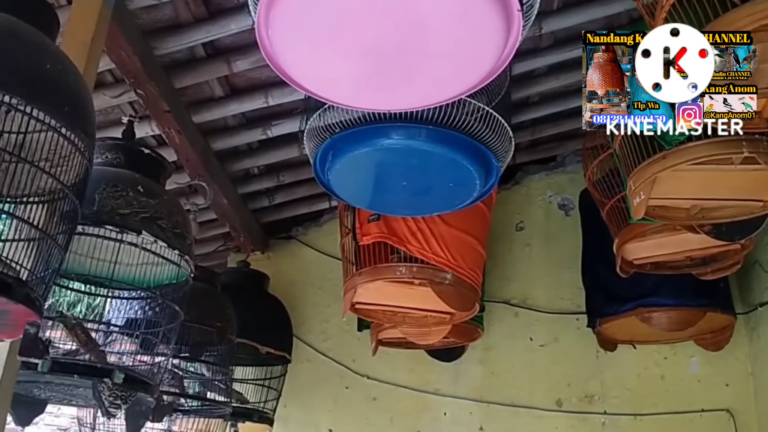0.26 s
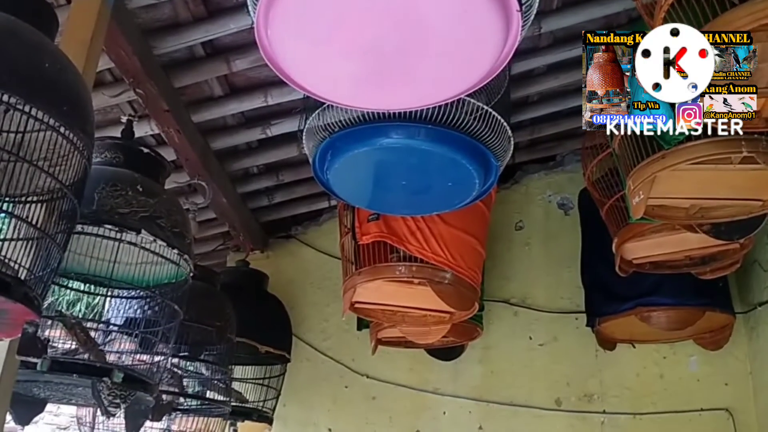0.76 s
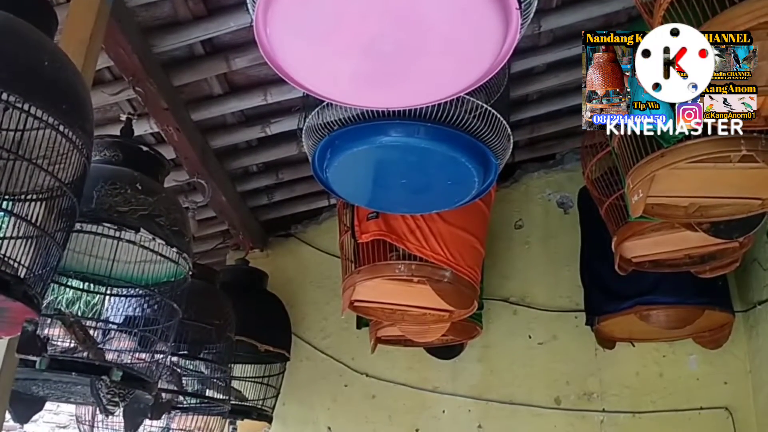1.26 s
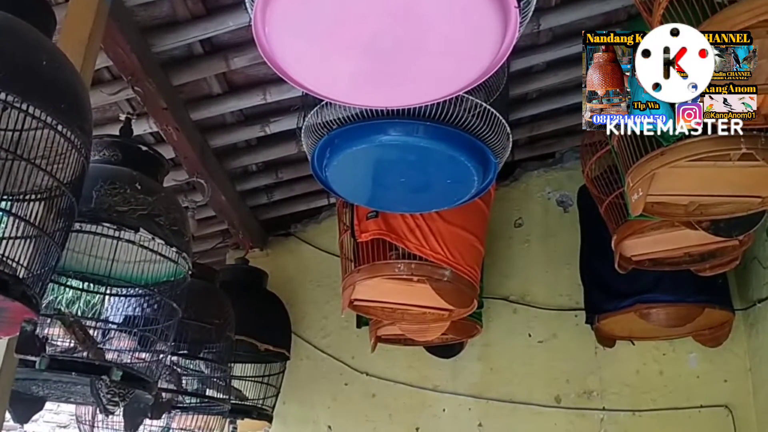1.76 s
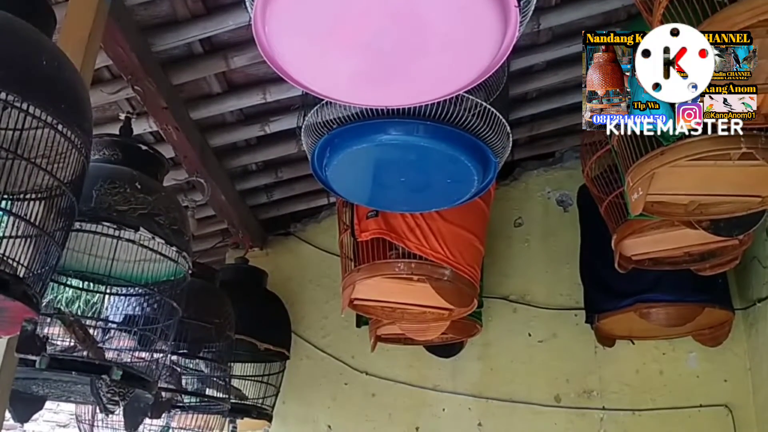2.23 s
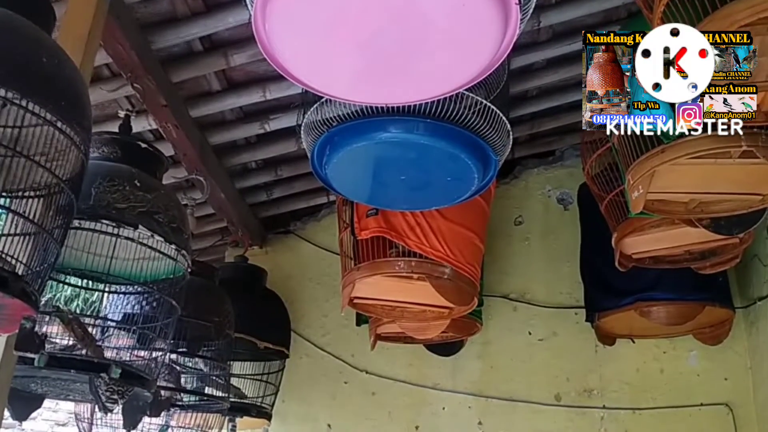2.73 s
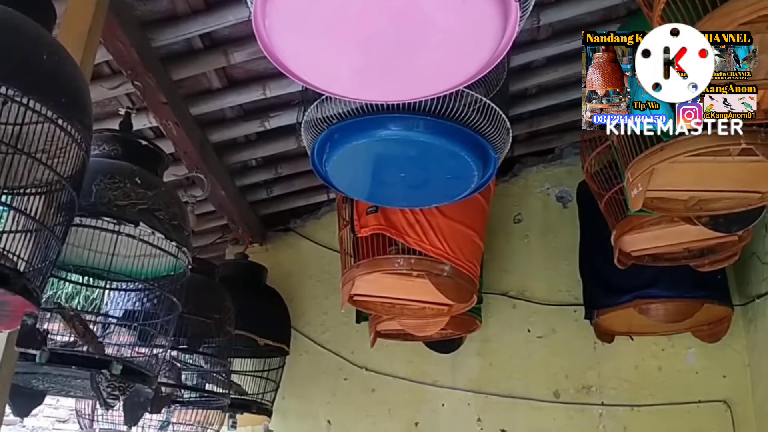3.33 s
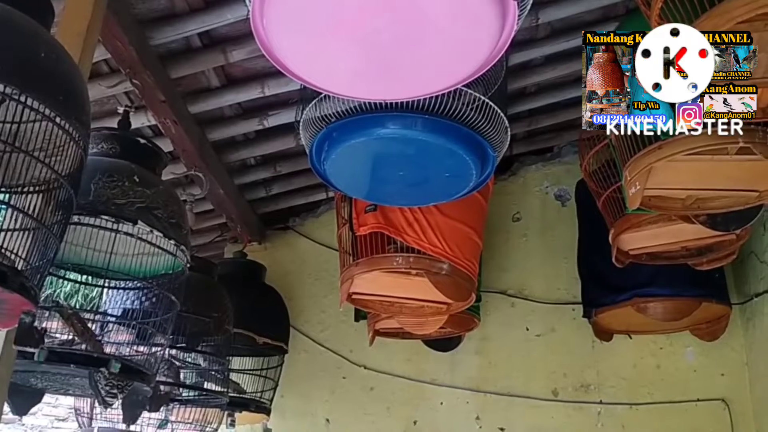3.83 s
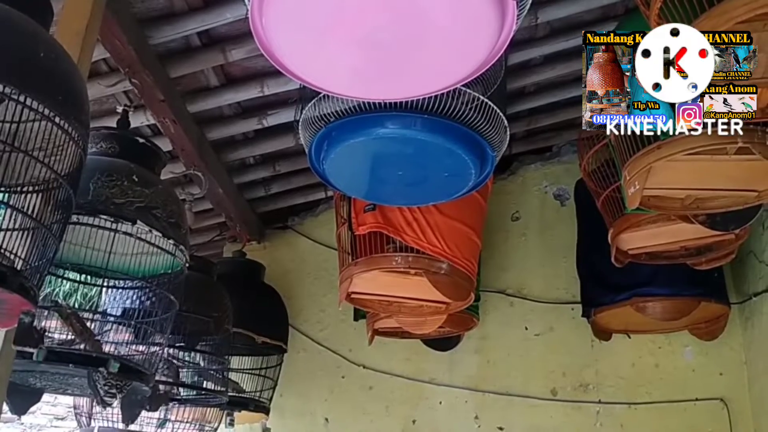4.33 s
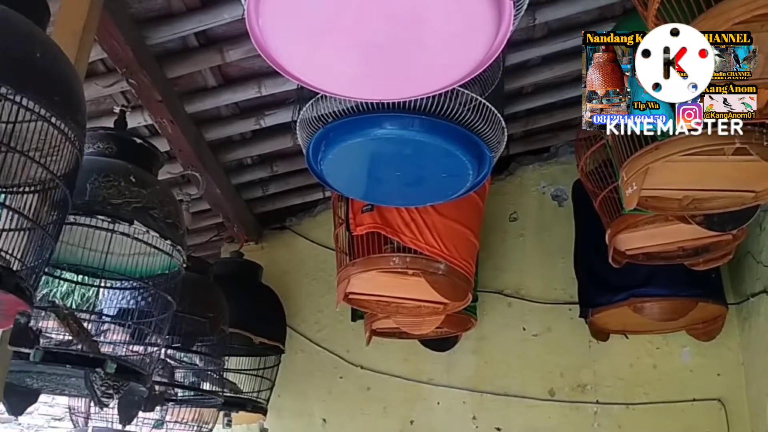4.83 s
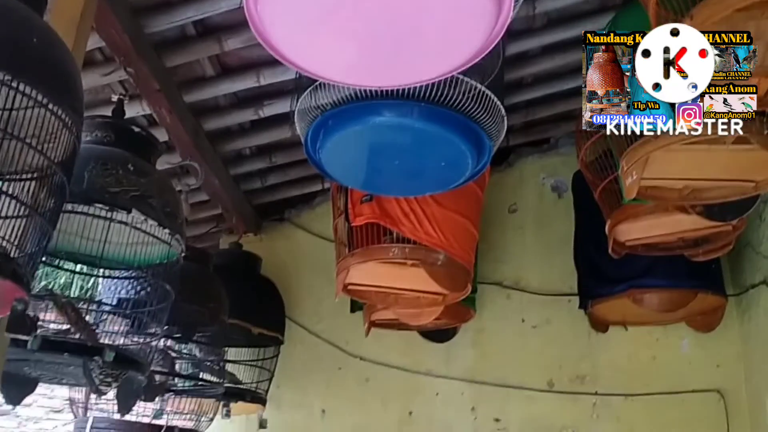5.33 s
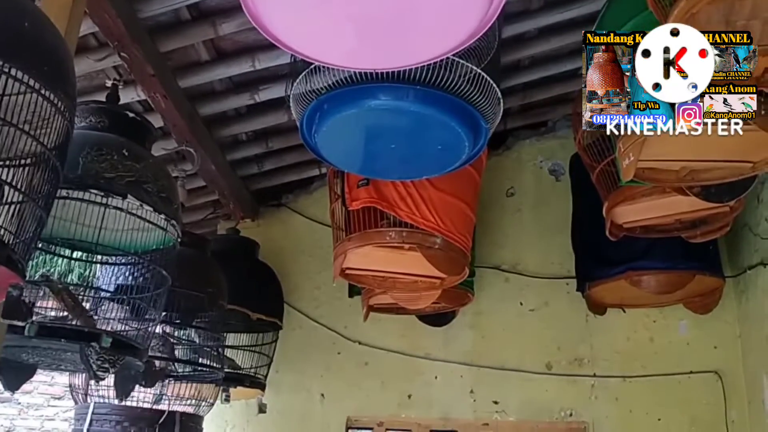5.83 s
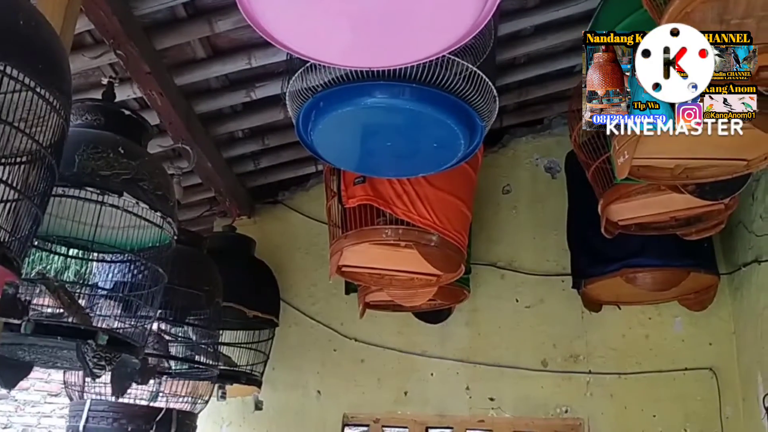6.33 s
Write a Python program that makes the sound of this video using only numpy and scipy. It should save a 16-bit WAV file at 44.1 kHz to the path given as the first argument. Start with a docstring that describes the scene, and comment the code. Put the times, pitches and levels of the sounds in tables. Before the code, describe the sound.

A low rumble of distant traffic and breeze runs throughout, with fine, dry rustling and crackling close by. At 0.3 seconds a caged dove begins a coo: a short note, a purring trill from 0.7 to 1.7, a long fluttering note that swells into a nearly pure tone, and a low falling ending by 2.6. From about 2.7 to 3.6 seconds a smaller dove answers with a few higher piping notes, the first loud and clear. The first dove coos again from 3.7 seconds, trilling from 4.2, swelling from 5.3 and falling away by 6.1. Light taps on cage wire and wood are scattered throughout, with thin ticks between 5 and 6 seconds and a sharper knock near 5.7. Far birds call faintly now and then. The roofed, open-sided shelter gives the calls a short, slightly ringing echo.

```python
"""Under a tiled roof, a caged dove coos twice: a short note, a purring trill, a long swell, a low ending.
Its inflated throat resonates in a nearly pure tone, which flutter modulates in level and pitch.
A smaller dove answers higher and far birds call. Cage wire and wood ring at their natural modes,
something dry rustles and ticks close by, and the shelter adds echoes and standing waves.
The low rumble of distant traffic and breeze lies under it all."""
import sys
import numpy as np
from scipy import signal
from scipy.io import wavfile
from scipy.ndimage import uniform_filter1d

SR = 44100
rng = np.random.default_rng(int(sys.argv[2]) if len(sys.argv) > 2 else 0)


def digitize_waveform(pressure):
    """Quantize a signal to 16-bit integers and store it at the path in sys.argv[1].

    Rows of a 2-D input are taken as channels; values are limited to [-1, 1].
    """
    field = np.atleast_2d(pressure).T
    bounded = np.clip(field, -1, 1)
    quanta = np.round(bounded * 32767).astype(np.int16)
    wavfile.write(sys.argv[1], SR, quanta)


N = 290611

# spectrum of the outdoor rumble: (frequency [Hz], relative density [dB])
RUMBLE_SPECTRUM = [(8.8, -35.5), (15, 4.5), (81, -3.5), (145, -13), (183, -12.5), (220, -14.5),
                   (414, -16.5), (466, -14.5), (536, -23.5), (588, -15.5), (761, -24.5), (836, -21.5),
                   (896, -27), (1370, -37), (4000, -57), (5200, -70.5), (8800, -120)]
# low hums in the rumble: (frequency [Hz], bandwidth [Hz], level [dB])
HUM_BANDS = [(46, 3, -44), (66, 6, -46)]
# far birds and thin squeaks: (time [s], duration [s], start pitch [Hz], end pitch [Hz], level [dB],
# second harmonic level [dB], pitch wander [Hz])
FAR_CALLS = [(0, .12, 810, 800, -50, -80, 15), (1.58, .36, 1560, 1540, -63, -80, 50),
             (2.36, .28, 1410, 1400, -61, -80, 15), (1.595, .065, 2565, 2565, -63, -53, 8),
             (1.665, .035, 2565, 2565, -66, -58, 8), (3.23, .1, 2500, 2500, -72, -67, 20),
             (3.12, .16, 2550, 1950, -62, -80, 150), (3.03, .05, 1700, 1800, -57, -80, 40),
             (6.14, .09, 760, 760, -51, -80, 10), (6.28, .3, 835, 825, -52, -80, 10)]
# taps on cage wire: (time [s], level [dB], ring pitch [Hz])
WIRE_TAPS = [(.026, -45, 3402), (3.591, -43, 3467), (5.2154, -44, 3542)]
# modes of the wire: (frequency [multiple of ring pitch], gain [dB], 60 dB decay time [s])
WIRE_MODES = [(.5, -5, .1), (.67, -14, .08), (.93, -15, .1), (.992, -7, .15), (1, -2, .15),
              (1.009, -11, .36), (1.21, -11, .1), (1.46, -11, .12), (2.0, -5, .2)]
# swishes and crackles: (peak time [s], level [dB], 20 dB rise time [s], 60 dB decay time [s])
RUSTLE_STROKES = [(.03, -47, .03, .5), (.235, -44, .2, .5), (.355, -46, .04, .7), (.492, -42, .01, .2),
                  (.64, -39, .05, .8), (.86, -48, .03, .3), (1.287, -35, .013, .4), (1.368, -42, .01, .15),
                  (1.697, -29.5, .008, .22), (1.93, -36, .012, .22), (2.0, -42, .01, .2),
                  (2.11, -43, .01, .2), (2.18, -42, .1, .3), (2.49, -47, .03, .4), (2.725, -43, .01, .2),
                  (2.93, -38, .1, .5), (3.1, -42, .015, .25), (3.325, -34.5, .08, .6), (3.5, -37, .05, .4),
                  (3.64, -43, .03, .15), (3.705, -38.5, .12, .7), (3.852, -41, .01, .12),
                  (3.915, -37.5, .008, .3), (4.045, -41, .02, 1.8), (4.34, -45, .03, .15),
                  (4.441, -35.5, .012, .4), (4.582, -43, .015, .2), (4.77, -44, .2, .6),
                  (4.912, -32.5, .005, .25), (5.037, -43, .015, .15), (5.138, -42, .01, .2),
                  (5.23, -41, .04, .2), (5.37, -45, .06, .2), (5.392, -43, .006, .15),
                  (5.49, -43, .04, .15), (5.56, -41, .007, .15), (5.632, -44, .015, .4),
                  (5.722, -37, .05, .3), (5.96, -44, .01, .15), (6.31, -36.5, .13, 1.3),
                  (6.52, -42, .01, .15)]
# spectra of soft and hard rustling: (frequency [Hz], relative density [dB])
SOFT_SPECTRUM = [(1470, -52.5), (2500, -41.5), (3090, -35), (3570, -11.5), (3950, -17), (5890, -10.5),
                 (7030, -4), (7540, 6), (7880, -11), (8290, -17), (10800, -43), (18200, -120)]
HARD_SPECTRUM = [(1470, -68.5), (2500, -39), (3240, -30.5), (5890, -11.5), (7420, 6), (7810, 0),
                 (8290, -19.5), (10800, -47), (18200, -120)]
# thin rings in the rustle: (frequency [Hz], bandwidth [Hz], gain [dB])
RUSTLE_RINGS = [(7500, 50, -3), (7720, 40, -6)]
# starts of the large dove's coos: (time [s], gain [dB])
COO_STARTS = [(.305, 0), (3.735, 0)]
# each coo's rising pickup and short sagging note: (time into the coo [s], pitch [Hz], level [dB])
PICKUP_CONTOUR = [(0, 475, -36), (.016, 505, -27), (.035, 560, -25)]
SHORT_CONTOUR = [(.03, 540, -24), (.04, 660, -25), (.1, 626, -25.5), (.15, 608, -26), (.2, 599, -33),
                 (.28, 592, -44)]
# knocks on cage wood: (time [s], burst level [dB], centre [Hz], 60 dB decay time [s], ring level [dB])
WOOD_KNOCKS = [(.6173, -49.5, 1380, .13, -62), (.971, -53.5, 1310, .09, -66), (1.289, -41, 2700, .14, -50),
               (3.5223, -48, 1420, .11, -60), (5.561, -43.5, 1630, .06, -62), (5.6337, -46, 1340, .16, -58),
               (5.703, -35, 4200, .08, -45), (5.714, -30, 4300, .15, -37), (6.125, -54, 1830, .09, -66)]
# modes of the wood: (frequency [Hz], gain [dB], 60 dB decay time [s])
WOOD_MODES = [(1405, -6, .25), (1500, -4, .15), (3100, -8, .06), (4200, -7, .1), (4447, -7, .16),
              (4635, -9, .22)]
# puffs of the trill: (time [s], level [dB], duration [s], end pitch [Hz])
TRILL_PUFFS = [(.701, -41, .03, 540), (.816, -37, .03, 540), (.881, -37, .03, 560), (.937, -35, .036, 540),
               (.999, -33, .045, 540), (1.053, -32, .058, 530), (1.123, -34, .04, 620),
               (1.19, -30, .062, 535), (1.272, -29, .056, 535), (1.347, -28, .062, 545),
               (1.429, -28, .074, 555), (1.526, -29, .1, 700), (1.635, -29, .1, 630),
               (4.176, -41, .034, 640), (4.242, -36, .032, 560), (4.309, -44, .035, 640),
               (4.354, -38, .038, 660), (4.409, -31, .036, 560), (4.474, -35, .04, 670),
               (4.538, -33, .035, 560), (4.609, -29, .062, 540), (4.682, -28, .04, 560),
               (4.76, -28, .064, 545), (4.843, -28, .062, 580), (4.928, -30, .084, 610),
               (5.032, -27, .122, 720), (5.172, -29, .105, 650)]
# long swelling notes, one list each: (time [s], pitch [Hz], level [dB], flutter depth [0-1])
LONG_CONTOURS = [
    [(1.73, 646, -24, .1), (1.765, 660, -21, .15), (1.79, 684, -29, .7), (1.87, 672, -28, .75),
     (1.98, 680, -28, .75), (2.035, 674, -23, .6), (2.06, 671, -18.5, .1), (2.09, 671, -15, .05),
     (2.18, 669, -15.5, .05), (2.255, 660, -13, .07), (2.3, 651, -15, .05), (2.33, 648, -19.5, .05),
     (2.344, 640, -27, .05), (2.353, 630, -23, .1), (2.365, 620, -28, .1)],
    [(5.27, 648, -21, .05), (5.305, 660, -18, .05), (5.325, 692, -30, .6), (5.42, 680, -29, .8),
     (5.45, 680, -27, .5), (5.462, 680, -21, .1), (5.473, 680, -28, .1), (5.485, 680, -19, .1),
     (5.498, 678, -30, .1), (5.51, 673, -17, .1), (5.545, 672, -18, .1), (5.56, 674, -34, .1),
     (5.575, 673, -15, .05), (5.63, 668, -14.5, .03), (5.7, 659, -14.5, .05), (5.735, 652, -18, .03),
     (5.75, 648, -16, .03), (5.762, 635, -32, .03), (5.774, 622, -18, .03), (5.786, 618, -19, .03),
     (5.8, 612, -13, .03), (5.81, 610, -15, .03), (5.822, 606, -18, .05), (5.845, 598, -36, .1)],
]
# low endings of the coos: (time [s], duration [s], start pitch [Hz], end pitch [Hz], level [dB])
LOW_ENDINGS = [(2.355, .28, 556, 492, -28), (5.815, .275, 560, 497, -28)]
# hoarse catches that open the small dove's louder notes: (time [s], level [dB])
THROAT_CATCHES = [(2.741, -36), (3.127, -41), (3.255, -45)]
# the small dove's notes, one list each: (time [s], pitch [Hz], level [dB])
PIPING_CONTOURS = [
    [(2.762, 925, -32), (2.785, 945, -17), (2.804, 958, -11), (2.818, 953, -16), (2.84, 951, -13),
     (2.9, 948, -14), (2.94, 944, -13), (2.968, 942, -23), (2.992, 942, -18), (3.022, 930, -32),
     (3.036, 890, -29), (3.062, 880, -38)],
    [(3.062, 900, -36), (3.073, 905, -28), (3.083, 908, -36), (3.095, 912, -25), (3.11, 900, -36),
     (3.135, 900, -42)],
    [(3.138, 905, -36), (3.15, 918, -29), (3.173, 928, -20), (3.185, 915, -31), (3.2, 915, -28),
     (3.222, 915, -30), (3.238, 895, -39), (3.265, 905, -40)],
    [(3.265, 905, -38), (3.285, 925, -25), (3.3, 940, -15), (3.312, 938, -19), (3.326, 936, -16),
     (3.36, 933, -24), (3.378, 930, -37), (3.405, 925, -28), (3.42, 915, -37), (3.435, 928, -34),
     (3.49, 930, -41), (3.61, 925, -50)],
]
# thin ticks, as of seed husks cracking: (time [s], level [dB], centre [Hz], 60 dB decay time [s])
DRY_TICKS = [(5.133, -36, 6960, .12), (5.215, -39, 7220, .2), (5.391, -39, 6550, .12),
             (5.559, -41, 6700, .05), (5.958, -43, 7630, .05)]
# standing waves between roof, wall and floor: (frequency [Hz], gain [dB], nominal decay time [s])
SHELTER_MODES = [(497, 0, 0.24), (534, -9, 0.33), (575, 0, 0.19), (615, -5, .45), (663, -11.5, 0.43),
                 (699.3, -7.5, 0.35), (840, -10, .5), (933, -4, 0.53), (955, -4, 0.8)]
# early reflections: (delay [s], gain [dB])
REFLECTIONS = [(.004, -17.5), (.011, -4), (.019, -9), (.031, -11.5)]


def gain_of(db):
    """Amplitude grows tenfold for every 20 decibels."""
    return 10 ** (np.asarray(db) / 20)


def unit_rms(x):
    """Normalisation to a mean power of one."""
    return x / np.sqrt(np.mean(x ** 2) + 1e-20)


def spectrum_at(points, hz):
    """Interpolation of a spectrum on a logarithmic frequency axis."""
    frequencies, db = np.transpose(points)
    return np.interp(np.log(hz + 1), np.log(frequencies + 1), db)


def contour(rows):
    """Linear interpolation of a note: its start time, then each column sample by sample."""
    times, *columns = np.transpose(rows)
    t = np.arange(times[0], times[-1], 1 / SR)
    return times[0], *(np.interp(t, times, column) for column in columns)


def mix(*sources):
    """Superposition: the (start time, sound) pairs of all sources add linearly."""
    out = np.zeros(N)
    for source in sources:
        for start, sound in source:
            part = out[round(start * SR):][:len(sound)]
            part += sound[:len(part)]
    return out


def resonate(x, hz, width_hz):
    """A resonance of unit gain: the band is shifted to zero frequency, smoothed and shifted back."""
    carrier = np.exp(2j * np.pi * np.cumsum(np.full(len(x), hz)) / SR)
    pole = np.exp(-np.pi * width_hz / SR)
    return 2 * (carrier * signal.lfilter([1 - pole], [1, -pole], x / carrier)).real


def damped_modes(modes, t):
    """Free vibration is a sum of exponentially decaying sinusoids."""
    return sum(gain_of(db - 60 * t / t60) * np.sin(2 * np.pi * hz * t) for hz, db, t60 in modes)


def tone(hz, *levels_db, fade_s=.008):
    """A harmonic series on one pitch curve, tapered at both ends."""
    phase = 2 * np.pi * np.cumsum(hz) / SR
    wave = sum(gain_of(db) * np.sin(k * phase) for k, db in enumerate(levels_db, 1))
    return np.sqrt(2) * wave * signal.windows.tukey(len(hz), min(1, 2 * fade_s * SR / len(hz)))


def shaped_noise(shape_db, size):
    """Fourier synthesis from random short-time spectra whose level is shape_db(hz, times)."""
    frames, hz = 4 * N // size + 5, np.fft.rfftfreq(size, 1 / SR)
    real, imaginary = rng.standard_normal((frames, len(hz), 2)).T
    times = np.arange(frames) * size / 4 / SR
    spectra = (real + 1j * imaginary) * gain_of(shape_db(hz[:, None], times))
    return signal.istft(spectra, nperseg=size, noverlap=3 * size // 4)[1][:N]


def outdoor_rumble():
    """Distant traffic and breeze: broadband noise heavy in the bass, with wavering narrowband hums."""
    def colour(hz, times):
        patches = rng.standard_normal((len(times), len(hz))).T
        patches = uniform_filter1d(uniform_filter1d(patches, 8, axis=0), 8, axis=1)
        return spectrum_at(RUMBLE_SPECTRUM, hz) + 1.5 * unit_rms(patches)
    hum = sum(gain_of(db) * unit_rms(resonate(rng.standard_normal(N), hz, width))
              for hz, width, db in HUM_BANDS)
    return gain_of(-35.7) * unit_rms(shaped_noise(colour, size=2048)) + hum


def far_birds():
    """Random frequency modulation blurs each faint, gliding whistle."""
    for start, duration, start_hz, end_hz, db, second_db, wander_hz in FAR_CALLS:
        wander = unit_rms(uniform_filter1d(rng.standard_normal(SR), 250))[:round(duration * SR)]
        hz = np.linspace(start_hz, end_hz, len(wander)) + wander_hz * wander
        yield start, tone(hz, db, second_db, fade_s=.025)


def wire_clinks():
    """Tapped wire rings at inharmonic modes; modulation by noise roughens the ring into a clack."""
    t, rise_s = np.arange(SR // 2) / SR, .003
    for start, db, hz in WIRE_TAPS:
        ring = damped_modes([(ratio * hz, mode_db, t60) for ratio, mode_db, t60 in WIRE_MODES], t)
        roughness = 1 + rng.standard_normal(len(t))
        yield start, gain_of(db) * ring * np.minimum(t / rise_s, 1) * roughness


def rustle():
    """Incoherent strokes of fine dry grains add in power; the louder a stroke, the more its hiss takes on a
    harder colour."""
    rest_db = -52
    soft_db, hard_db = -56, -37  # levels at which each spectrum holds
    t = np.arange(N) / SR
    power = gain_of(rest_db) ** 2
    for peak, db, rise_s, t60 in RUSTLE_STROKES:
        power += gain_of(db + np.minimum(20 * (t - peak) / rise_s, -60 * (t - peak) / t60)) ** 2

    def colour(hz, times):
        level_db = np.interp(times, t, 10 * np.log10(power))
        hardness = np.clip((level_db - soft_db) / (hard_db - soft_db), 0, 1.2)
        return (1 - hardness) * spectrum_at(SOFT_SPECTRUM, hz) + hardness * spectrum_at(HARD_SPECTRUM, hz)
    hiss = shaped_noise(colour, size=256)
    hiss += sum(gain_of(db) * resonate(hiss, hz, width) for hz, width, db in RUSTLE_RINGS)
    hiss /= np.sqrt(uniform_filter1d(hiss ** 2, 4000))  # the strokes alone set the loudness
    spikes = rng.exponential(1, N) ** 2 - 2
    grain_db = 1.37 * unit_rms(uniform_filter1d(uniform_filter1d(spikes, 60), 40))
    return hiss * np.sqrt(power) * unit_rms(gain_of(grain_db))


def throat_tone(hz, db, second_db, third_db, flutter):
    """The inflated throat hums one tone; uneven flutter modulates its amplitude and frequency."""
    flutter_hz, rate_wander, pitch_swing = 40, .12, .018
    grain = round(.006 * SR)
    rasp = uniform_filter1d(uniform_filter1d(rng.standard_normal(SR), grain), grain)
    rasp = .6 * unit_rms(rasp)[:len(hz)]
    drift = unit_rms(uniform_filter1d(rng.standard_normal(SR), 3000))[:len(hz)]
    phase = 2 * np.pi * np.cumsum(flutter_hz * (1 + rate_wander * drift)) / SR
    depth = np.clip(flutter, 0, 1)
    throb = depth * (np.sin(phase) - .4 * np.sin(2 * phase) + rasp)  # swells slowly, drops fast
    bend = pitch_swing * depth * (rasp - np.cos(phase))  # pitch rises through each throb
    overtone_db = db.max() + .4 * (db - db.max())  # overtones vary less than the fundamental
    return tone(hz * (1 + bend), db, overtone_db + second_db, overtone_db + third_db) * (1 + throb)


def coo_openings():
    """A rising glide breaks into a short sagging note as the modulation deepens."""
    for start, gain_db in COO_STARTS:
        delay, hz, db = contour(PICKUP_CONTOUR)
        yield start + delay, throat_tone(hz, db + gain_db, second_db=-28, third_db=-50, flutter=.15)
        delay, hz, db = contour(SHORT_CONTOUR)
        yield start + delay, throat_tone(hz, db + gain_db, second_db=-46, third_db=-43, flutter=.45)


def wood_knocks():
    """An impact on cage wood gives a burst of band noise and excites briefly ringing modes."""
    t, rise_s = np.arange(SR // 2) / SR, .005
    ring = damped_modes(WOOD_MODES, t)
    for start, db, hz, t60, ring_db in WOOD_KNOCKS:
        band = unit_rms(resonate(rng.standard_normal(len(t)), hz, width_hz=1200))
        burst = gain_of(db - 7 - 60 * t / t60) * band  # rms starts 7 dB under the burst level
        yield start, (burst + gain_of(ring_db) * ring) * np.minimum(t / rise_s, 1)


def trill():
    """Pulsed airflow makes the purr: in each puff the pitch drops fast, rests low, then climbs."""
    top_hz, low_hz, sag_hz_per_s, lead_s = 650, 515, 450, .002
    for beat, db, duration, end_hz in TRILL_PUFFS:
        t = np.arange(0, duration, 1 / SR)
        rest_hz = low_hz - sag_hz_per_s * duration  # longer puffs rest lower
        fall_hz = (top_hz - rest_hz) * np.exp(-(t / (.22 * duration)) ** 2)
        climb_hz = (end_hz - rest_hz) * (t / duration) ** 3.6
        hz = rest_hz + fall_hz + climb_hz
        pouch_db = -.7 + .04 * (hz - low_hz)  # the throat pouch sounds best high up
        onset_db = -6 * np.exp(-t / .01)
        push_db = 3.5 * np.exp(-((t - .015) / .006) ** 2)  # the first push of air stands out
        level_db = db + pouch_db + onset_db + push_db
        yield beat - lead_s, throat_tone(hz, level_db, second_db=-42, third_db=-58, flutter=.22)


def long_notes():
    """Deep modulation settles as each note swells into an almost sinusoidal tone."""
    for rows in LONG_CONTOURS:
        start, hz, db, flutter = contour(rows)
        yield start, throat_tone(hz, db, second_db=-47, third_db=-59, flutter=flutter)


def coo_endings():
    """A steepening downward glide swells and dies, its overtones fading ahead of the tone's end."""
    for start, duration, start_hz, end_hz, db in LOW_ENDINGS:
        progress = np.arange(0, duration, 1 / SR) / duration
        hz = start_hz + (end_hz - start_hz) * progress ** 1.5
        level_db = db - 8 * (1 - progress) ** 3 - 14 * progress ** 8
        dull_db = -10 * progress ** 3
        yield start, throat_tone(hz, level_db, dull_db - 23, dull_db - 44, flutter=.12)


def throat_catches():
    """Breath noise, narrowed by resonance, clicks in the small dove's throat before a note locks in."""
    centre_hz = 1070
    for start, db in THROAT_CATCHES:
        breath = resonate(rng.standard_normal(1200), centre_hz, width_hz=160)
        burst = resonate(breath, centre_hz, width_hz=300) * signal.windows.tukey(len(breath), .5)
        yield start, gain_of(db) * unit_rms(resonate(burst, centre_hz, width_hz=500))


def small_dove():
    """A higher throat tone, clear when loud and more deeply modulated the softer it gets."""
    firm_db, flutter_per_db = -21, .04
    for rows in PIPING_CONTOURS:
        start, hz, db = contour(rows)
        flutter = .04 + flutter_per_db * np.maximum(firm_db - db, 0)
        yield start, throat_tone(hz, db, second_db=-63, third_db=-76, flutter=flutter)


def dry_ticks():
    """Sharp transients: narrow bands of treble noise start at once and decay exponentially."""
    t = np.arange(SR // 2) / SR
    for start, db, hz, t60 in DRY_TICKS:
        band = resonate(rng.standard_normal(len(t)), hz, width_hz=500)
        snap = unit_rms(resonate(band, hz, width_hz=1000))
        yield start, gain_of(db - 60 * t / t60) * snap


def shelter(x):
    """Reflection gives a repeating roof-to-floor slap, early echoes, standing waves and a diffuse tail."""
    trip_s, trip_db, tail_db, tail_t60 = .012, -8, -13, .55
    slaps = [(trip * trip_s, trip * trip_db) for trip in range(1, 10)]
    echoes = mix((delay, gain_of(db) * x) for delay, db in slaps + REFLECTIONS)
    standing = sum((-1) ** k * gain_of(db) * resonate(x, hz, 2.43 / decay_s)
                   for k, (hz, db, decay_s) in enumerate(SHELTER_MODES))
    t = np.arange(SR) / SR
    scatter = rng.choice([-1., 1.], SR) * (rng.random(SR) < .05)
    response = scatter * gain_of(-60 * t / tail_t60) * (t > .02)
    tail = signal.fftconvolve(x, response / np.linalg.norm(response))[:N]
    return x + echoes + standing + gain_of(tail_db) * tail


def scene():
    """Direct and reflected sound of birds and cage superpose on the rustle and rumble."""
    piping = mix(small_dove())
    birds = mix(coo_openings(), long_notes(), coo_endings(), trill(), throat_catches(), far_birds())
    cage = mix(wire_clinks(), wood_knocks(), dry_ticks())
    # the small dove hangs near the open side, so less of its voice is reflected
    sheltered = gain_of(-1.5) * shelter(birds + cage + gain_of(-7) * piping)
    return (sheltered + gain_of(-2.5) * piping + rustle() + outdoor_rumble())[None]


def record(dry):
    """The microphone's limited bandwidth acts as a steep low-pass filter."""
    cutoff_hz = 8440
    low_pass = signal.firwin(511, cutoff_hz, window=("kaiser", 9), fs=SR)
    return signal.oaconvolve(dry, low_pass[None], "same")


dry = scene()
out = record(dry)
digitize_waveform(out)
```